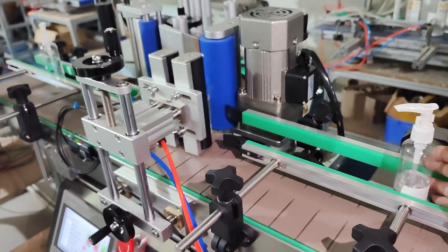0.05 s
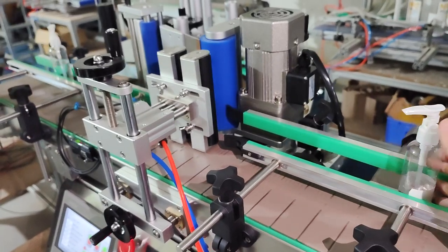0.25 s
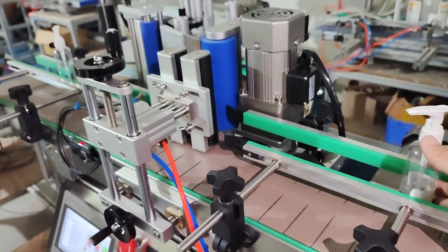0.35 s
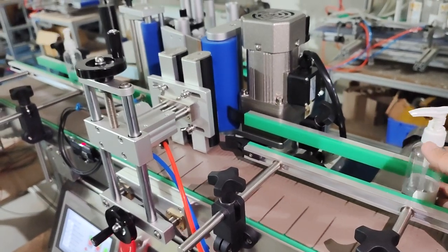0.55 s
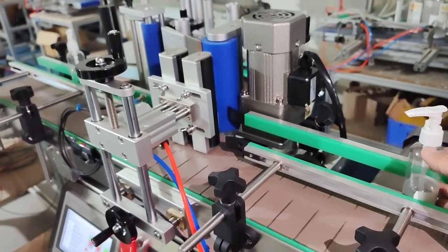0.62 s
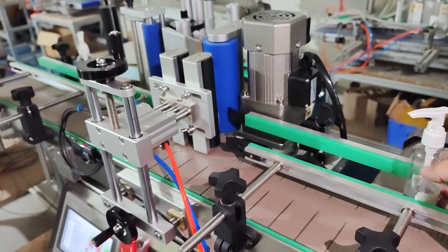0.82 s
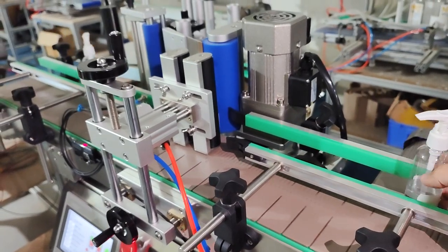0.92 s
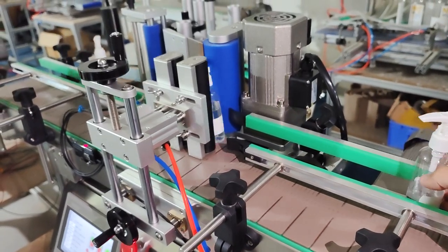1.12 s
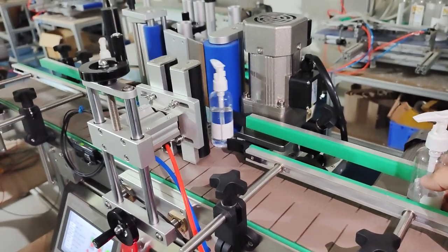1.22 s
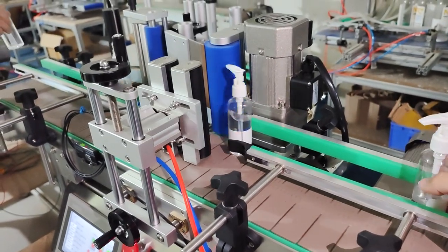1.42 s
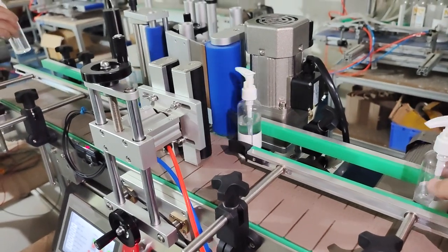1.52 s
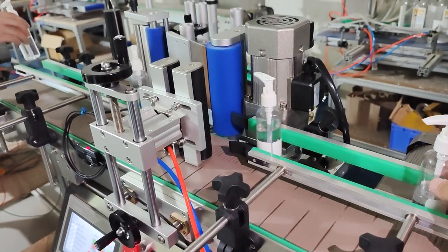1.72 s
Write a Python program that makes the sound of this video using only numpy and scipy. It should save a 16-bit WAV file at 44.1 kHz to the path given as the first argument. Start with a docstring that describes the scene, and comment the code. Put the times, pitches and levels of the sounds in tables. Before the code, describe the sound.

A labelling machine runs close by in a workshop, with a soft conveyor whirr, fine rattle and faint low hum. At 0.2 s a very loud slam thumps the frame and rings metal, followed by clacks around 0.35-0.4 and a hollow, softly ringing knock at 0.5. Lighter clacks come at 0.8 and 1.06, a second heavy ringing slam at 1.2, then a hollow double knock near 1.44.

```python
"""On a workshop bench, a bottle labelling machine runs close by.
Its mechanism slams hard twice against a stop: the frame thumps as decaying low tones and the metal
fittings ring on as beating tones in a noisy shimmer, with weaker strokes and a softer ring besides.
Clacks are short noise bursts with brief notes, dull bumps are sliding low tones. Behind them run
the conveyor's noisy whirr, a fine rattle and a faint steady-pitched hum."""
import sys
import numpy as np
from scipy import signal
from scipy.fft import rfft, irfft
from scipy.io import wavfile

SR = 44100
rng = np.random.default_rng(int(sys.argv[2]) if len(sys.argv) > 2 else 0)


def generate_wav(sig):
    """Save sig (samples, or channels by samples) to the path in sys.argv[1] as 16-bit PCM at SR."""
    pcm = np.round(np.clip(np.atleast_2d(sig).T, -1, 1) * 32767).astype(np.int16)
    wavfile.write(sys.argv[1], SR, pcm)


N = 77175  # length of the scene [samples]
HARD_RISE_S = 0.0013  # how fast hard, bright sounds build up
RIPPLE_DB, RIPPLE_HZ = 3.5, 110  # height and spacing of the random peaks and dips in noise


def amp(db):
    """Turns decibels into a gain."""
    return 10 ** (np.asarray(db) / 20)


def unit(x):
    """Scales a signal to an rms of 1."""
    return x / np.sqrt(np.mean(x ** 2) + 1e-20)


def read(points, hz):
    """Reads a table between its points, along a logarithmic frequency axis."""
    f, v = np.transpose(points)
    return np.interp(np.log(hz + 1), np.log(f + 1), v)


def add(mix, s, sound):
    """Mixes a sound in at time s, cut off at the end of the scene."""
    part = mix[:, round(s * SR):][:, :sound.shape[-1]]
    part += sound[..., :part.shape[1]]


def dying(t, t60):
    """Exponential decay: the level falls by 60 dB in t60 seconds."""
    return np.exp(-np.log(1000) * t / t60)


def rising(t, rise_s):
    """Soft start: the level builds up quickly, then settles at full strength."""
    return 1 - np.exp(-t / rise_s)


# how alike left and right are in noise: (frequency [Hz], correlation [1 = identical])
LIKENESS = [(50, 1), (200, 0.93), (500, 0.61), (1000, 0.83), (2000, 0.017), (12000, 0.015)]


def noise(points, size, ripple_db=0):
    """Stereo noise of a given spectrum with random peaks, central in the bass and wide in the treble."""
    hz = np.fft.rfftfreq(size, 1 / SR)
    a, b = np.exp(2j * np.pi * rng.random((2, len(hz))))  # random phases
    alike = np.clip(read(LIKENESS, hz), -1, 1)
    mid = a * np.sqrt((1 + alike) / 2)
    side = b * np.sqrt((1 - alike) / 2)
    grid = np.arange(0, SR / 2, RIPPLE_HZ)
    up_or_down = rng.choice([-1, 1], len(grid))
    peaks = unit(amp(ripple_db * np.interp(hz, grid, up_or_down)))
    spectrum = np.array([mid + side, mid - side]) * peaks * amp(read(points, hz))
    return irfft(spectrum, size) * np.sqrt(size)


# spectrum of the running conveyor: (frequency [Hz], relative level [dB per Hz])
WHIRR = [(20, -16), (62, -2), (100, -0.5), (155, 4), (220, 0), (350, -6), (500, -10), (750, -9.5),
         (1300, -15.5), (2100, -24), (3500, -29.5), (6000, -33), (16000, -64.5)]
# loudness of the whirr: (time [s], bass level [dB], treble level [dB])
WHIRR_LEVEL = [(0, -45, -40), (.16, -41, -36.5), (.45, -39.5, -37), (0.699, -41.5, -33), (1.0, -43.5, -34),
               (1.35, -40, -34), (1.6, -42.5, -37), (1.75, -48.5, -38)]


def whirr():
    """Steady noise whose bass and treble swell and fade separately."""
    t = np.arange(N) / SR
    steady = unit(noise(WHIRR, size=N))
    low_pass = signal.butter(2, 1800, fs=SR, output="sos")
    bass = signal.sosfiltfilt(low_pass, steady)
    treble = steady - bass
    s, bass_db, treble_db = np.transpose(WHIRR_LEVEL)
    return bass * amp(np.interp(t, s, bass_db)) + treble * amp(np.interp(t, s, treble_db))


RATTLE_PER_S, RATTLE_T60_S, RATTLE_DB = 87, 0.058, -52.5
# spectrum of the rattling chain links: (frequency [Hz], relative level [dB per Hz])
RATTLE = [(100, -26), (500, -0.5), (1200, 3.5), (3000, -12.5), (14000, -63)]


def rattle():
    """Chain links tick at random moments, some harder; each tick is a short swell of noise."""
    t = np.arange(N) / SR
    strength = amp(3.3 * np.minimum(rng.exponential(1, N), 2))
    ticks = (rng.random(N) < RATTLE_PER_S / SR) * strength
    one_tick = dying(t, RATTLE_T60_S) * rising(t, HARD_RISE_S)
    envelope = signal.fftconvolve(ticks, one_tick)[:N]
    return amp(RATTLE_DB) * unit(envelope * noise(RATTLE, size=N))


HUM_HZ = 60.4
# loudness of the motor's hum: (time [s], level [dB])
HUM_LEVEL = [(.15, -38), (.85, -51), (1.75, -48)]


def hum():
    """The motor hums on one low pure tone of changing loudness."""
    t = np.arange(N) / SR
    return amp(np.interp(t, *np.transpose(HUM_LEVEL))) * np.sin(2 * np.pi * HUM_HZ * t)


BUMP_GLIDE = .1  # typical share by which the pitch starts off to one side and ends off to the other
# dull bumps of the conveyor: (time [s], length [s], level [dB], middle pitch [Hz])
BUMPS = [(0.266, 0.031, -30.5, 207), (0.318, .06, -26.5, 206), (0.38, 0.041, -25.5, 290),
         (.416, 0.0287, -23.5, 163.6), (.505, 0.051, -28.5, 154.7), (0.809, 0.06, -30.5, 145.4),
         (.885, 0.053, -33.5, 168.5), (1.065, 0.043, -30.5, 170), (1.297, 0.066, -28, 199.2),
         (1.328, 0.029, -25.5, 213), (1.378, 0.052, -28, 161.5), (1.401, 0.033, -26.5, 208.5),
         (1.452, 0.066, -30, 151), (1.496, 0.046, -34.5, 303)]


def bumps():
    """Soft low swells, each sliding a little in pitch, as the conveyor shakes the bench."""
    out = np.zeros((2, N))
    for s, length, db, hz in BUMPS:
        t = np.arange(0, length, 1 / SR)
        glide = BUMP_GLIDE * rng.standard_normal()
        turns = hz * (t + glide * t * (t / length - 1))
        swell = np.sin(np.pi * t / length)
        add(out, s, amp(db) * swell * np.sin(2 * np.pi * turns))
    return out


# short notes of the parts that the clacks strike: (time [s], pitch [Hz], level [dB], t60 [s])
KNOCKS = [(0.168, 944, -27.5, 0.06), (0.2096, 885, -22, .11), (.210, 3533, -26.5, 0.18),
          (.210, 3690, -25, 0.088), (0.2173, 7460, -28, 0.13), (.222, 3240, -41, .55),
          (0.3725, 1613, -27, 0.086), (.3745, 1320, -29, .06), (.397, 776, -28.5, 0.072),
          (.505, 872, -27.5, 0.23), (.507, 694, -34, 0.13), (.508, 993, -29, 0.1),
          (0.7975, 1430, -34, 0.13), (.800, 360, -31.5, 0.095), (1.0, 3160, -45, 0.073),
          (1.0636, 1017, -25, 0.08), (1.0635, 683, -22.5, 0.053), (1.2138, 4450, -21, 0.064),
          (1.212, 4850, -20.5, 0.051), (1.229, 4540, -35, 0.63), (1.335, 4560, -41, .14),
          (1.4345, 736, -16, 0.047), (1.449, 775, -21.5, 0.041), (1.4497, 2760, -23, 0.032),
          (1.473, 742, -27.5, 0.068)]


def knocks():
    """Each struck part sounds its own brief note, hollow or metallic."""
    out, t = np.zeros((2, N)), np.arange(SR // 2) / SR
    for s, hz, db, t60 in KNOCKS:
        lag_s = rng.uniform(-7e-5, 7e-5, (2, 1))  # a tiny shift of the wave in each ear
        note = np.sin(2 * np.pi * hz * (t - lag_s)) * dying(t, t60)
        add(out, s, amp(db) * note * rising(t, HARD_RISE_S))
    return out


BASS_CUT_DB, TOP_CUT_DB = -9, -9  # change from the outermost bands out to 60 Hz and 16 kHz
# centres of the clacks' six bands: plain list of (frequency [Hz])
CLACK_HZ = [350, 850, 1600, 3300, 6000, 11000]
# hard parts meeting: (time [s], t60 [s], then the relative level of each of the six bands [dB])
CLACKS = [ (0.2, 0.076, -8.5, -46, -25, -33, -29.5, -48),
          (0.2082, 0.091, -29, -17, -31, -26.5, -25.5, -39.5),
          (0.219, 0.14, -25.5, -58, -33, -31, -26.5, -41), (0.3511, 0.087, -53, -52, -44, -37.5, -38, -56),
          (0.3724, 0.041, -32, -23.5, -21.5, -28, -20.5, -45),
          (0.3805, 0.079, -13, -42, -29.5, -33, -34, -91), (.397, 0.1, -26, -26.5, -44, -34, -65, -59),
          (.502, 0.14, -54, -20.5, -27.5, -37, -38.5, -56), (.5085, 0.11, -59, -11, -52, -26, -35.5, -48.5),
          (.528, 0.31, -52, -23, -39, -41, -58, -58.5), (0.7626, 0.094, -41, -25, -40, -49, -53, -67),
          (0.796, 0.03, -29, -25, -17.5, -32.5, -25, -44), (1.06, 0.072, -40, -27, -28.5, -29, -46, -53),
          (1.0644, 0.043, -39, -18, -39, -40, -22, -43), (1.0710, 0.058, -17, -25.5, -27, -28, -34, -54),
          (1.1865, 0.16, -36, -32, -30, -30.5, -29.5, -43.5),
          (1.1982, 0.071, -3, -19, -17.5, -63, -32, -54), (1.2117, 0.11, -17.5, -25, -35.5, -26, -27, -42),
          (1.4338, 0.053, -15, -14, -28, -24.5, -29.5, -53.5),
          (1.449, 0.059, -12.5, -24, -29, -26, -30.5, -61)]


def clacks():
    """Hard parts meet: a sharp burst of crowded, quickly dying modes, coloured by the place struck."""
    out, t = np.zeros((2, N)), np.arange(SR // 5) / SR
    for s, t60, *db in CLACKS:
        colour = [(60, db[0] + BASS_CUT_DB), *zip(CLACK_HZ, db), (16000, db[-1] + TOP_CUT_DB)]
        burst = noise(colour, size=len(t), ripple_db=RIPPLE_DB) * dying(t, t60)
        add(out, s, amp(9.5) * burst * rising(t, HARD_RISE_S))
    return out


MODE_SPLIT = .004  # largest share by which each tone of a pair is detuned
# slams that set the fittings ringing: (time [s], level [dB], t60 of the shimmer [s])
SLAMS = [(0.2083, -34, 0.74), (.506, -42, 0.74), (1.1990, -29, 0.64)]
# ringing tones of the metal fittings: (pitch [Hz], relative level [dB], t60 [s])
FITTINGS = [(2900, -2, 0.84), (3010, -13, 0.66), (3580, -2, 0.39), (3684, -1, 0.31), (4305, 1, 0.53),
            (4230, 10, 0.2), (4867, -3.5, 0.77), (5700, -9, .45), (6080, -2, 0.46), (7420, -8, .35),
            (7700, -14, .3)]
# spectrum of their dense shimmer: (frequency [Hz], relative level [dB per Hz])
SHIMMER = [(100, -41), (1000, -43), (2000, -11), (3000, 0.5), (4400, 7.5), (7000, -6), (9500, -10.5),
           (16000, -36)]


def fittings():
    """Metal parts ring with beating pairs of modes and a dense shimmer."""
    out, t = np.zeros((2, N)), np.arange(SR * 3 // 4) / SR
    for s, db, t60 in SLAMS:
        modes = np.zeros((2, len(t)))
        for hz, mode_db, life in FITTINGS:
            pair_hz = hz * (1 + MODE_SPLIT * (2 * rng.random(size=(2, 1, 1)) - 1))
            start = rng.random(size=(2, 2, 1))  # phase of each tone in each ear
            pair = np.sin(2 * np.pi * (pair_hz * t + start)).sum(0)
            modes += amp(mode_db) * pair * dying(t, life)
        shimmer = unit(noise(SHIMMER, size=len(t), ripple_db=RIPPLE_DB)) * dying(t, t60)
        add(out, s, amp(db) * (shimmer + amp(-11.5) * modes) * rising(t, HARD_RISE_S))
    return out


THUMP_RISE_S = 0.0038
# strokes of the frame: (time [s], level [dB], pitch [Hz], t60 [s], level of the upper modes [dB])
THUMPS = [(.2080, 9, 196, 0.036, -25), (0.2278, -9.5, 218, 0.09, 4.5), (0.4076, -15.5, 211, 0.051, 6),
          (1.1884, -12, 220.3, 0.15, 13.5), (1.1985, 2, 206.7, 0.066, -2.5), (1.2228, -11, 217.3, 0.11, 8),
          (1.4655, -21.5, 167, 0.054, 12.5)]
# upper modes of the frame: (pitch [Hz], relative level [dB], t60 [s])
FRAME = [(280.6, -9.5, 0.059), (371.4, -13, 0.058), (443.1, -27.5, 0.28), (556, -29, 0.081)]


def thumps():
    """Each stroke rings the frame's low, well damped modes."""
    out, t = np.zeros((2, N)), np.arange(SR // 2) / SR
    for s, db, hz, t60, upper_db in THUMPS:
        ring = np.sin(2 * np.pi * hz * t) * dying(t, t60)
        for mode_hz, mode_db, life in FRAME:
            ring += amp(upper_db + mode_db) * np.sin(2 * np.pi * mode_hz * t) * dying(t, life)
        add(out, s, amp(db) * ring * rising(t, THUMP_RISE_S))
    return out * amp([[-.7], [.7]])  # slightly to the right


# how long the workshop rings on: (frequency [Hz], t60 [s])
ROOM = [(100, 1), (500, 0.43), (2000, 0.28), (6000, 0.31), (14000, 0.48)]


def room(x):
    """The workshop's diffuse tail: noise in which each band dies at its own speed."""
    flat = noise([(20, 0), (20000, 0)], size=SR)
    hz, t, bands = signal.stft(flat, SR, nperseg=256)
    tail = signal.istft(bands * dying(t, read(ROOM, hz)[:, None]), SR, nperseg=256)[1]
    tail = tail * rising(np.arange(tail.shape[1]) / SR, 0.0022)
    return signal.fftconvolve(x, tail / np.linalg.norm(tail[0]), axes=1)[:, :N]


CLACK_ROOM_DB, FRAME_ROOM_DB = -5, -18  # level of the room's tail
LEFT_DB = 0.5  # bright sounds: raised this much on the left, lowered as much on the right


def scene():
    """The machine in its room, from the conveyor behind to the slams in front."""
    background = whirr() + rattle() + hum() + bumps()
    hard, low = clacks(), thumps()
    bright = hard + knocks() + fittings() + amp(CLACK_ROOM_DB) * room(hard)
    bright = bright * amp([[LEFT_DB], [-LEFT_DB]])
    return background + bright + low + amp(FRAME_ROOM_DB) * room(low)


MIC_LOW_HZ, EDGE_HZ = 81, 16200  # the bass falls away below the first, the treble stops at the second
# treble colour of the microphone: (frequency [Hz], level [dB])
MIC = [(7800, 0.5), (9700, -3.5), (11500, 4.5), (12500, -23), (15500, -2.5)]


def record(dry):
    """The microphone's bass roll-off and treble colour, then a full-scale limit and a band edge."""
    hz = np.fft.rfftfreq(2 * N, 1 / SR)
    bass_cut = hz ** 2 / np.sqrt(hz ** 4 + MIC_LOW_HZ ** 4)
    heard = irfft(rfft(dry, 2 * N) * amp(read(MIC, hz)) * bass_cut)[:, :N]
    limited = np.clip(heard, -1, 1)
    edge = signal.firwin(511, EDGE_HZ, window=("kaiser", 9), fs=SR)
    return signal.oaconvolve(limited, edge[None], "same")


dry = scene()
out = record(dry)
generate_wav(out)
```